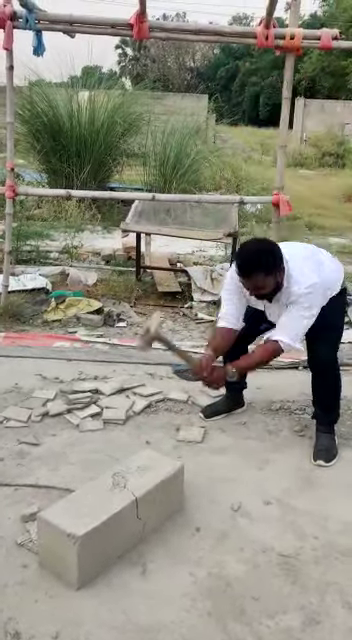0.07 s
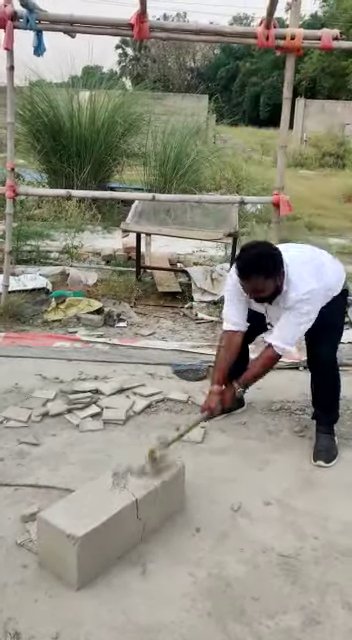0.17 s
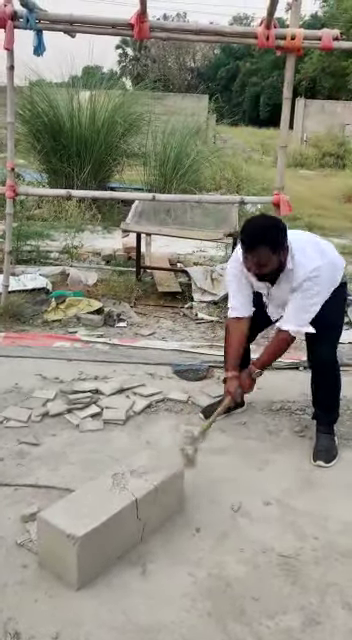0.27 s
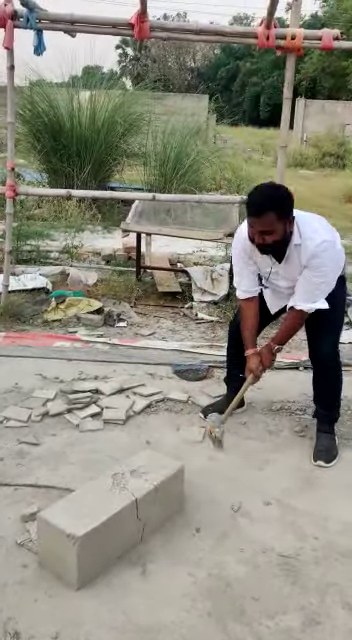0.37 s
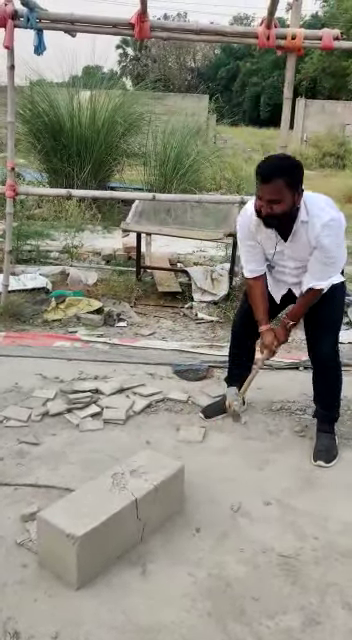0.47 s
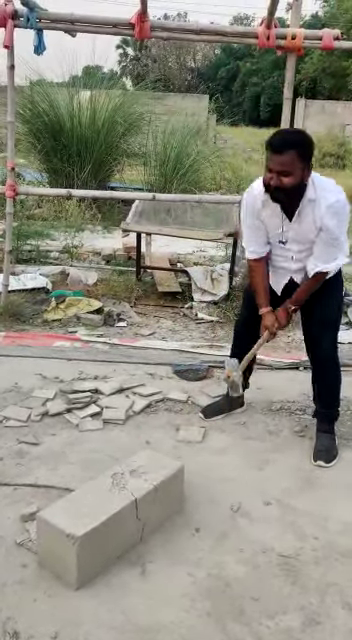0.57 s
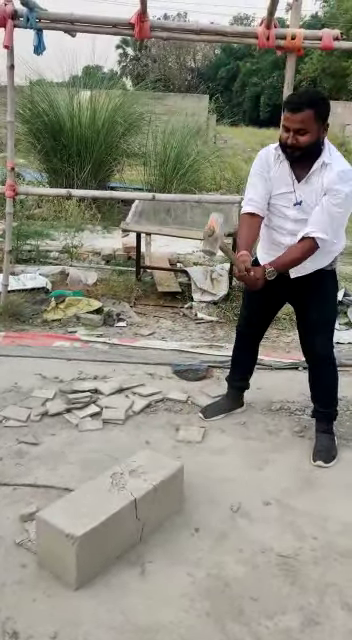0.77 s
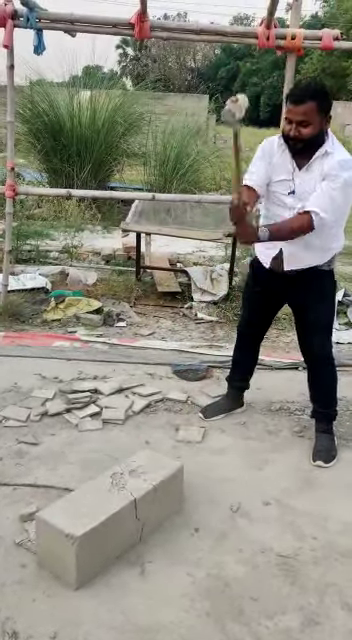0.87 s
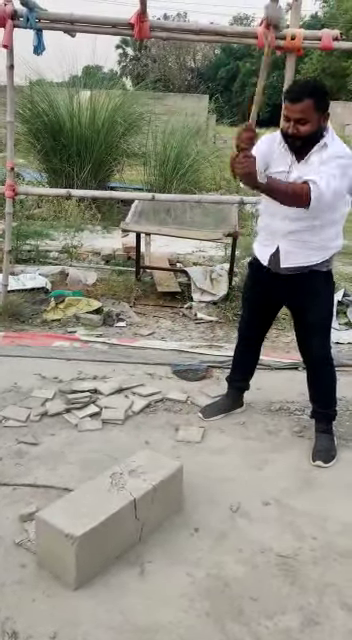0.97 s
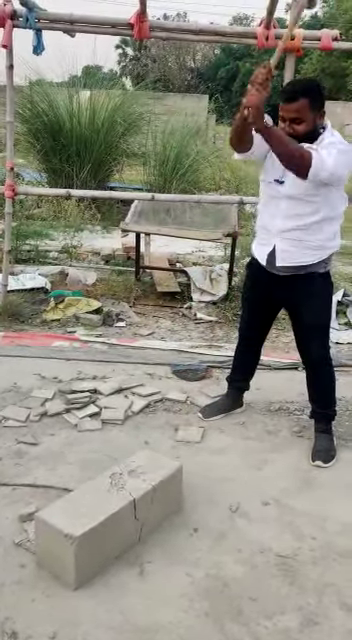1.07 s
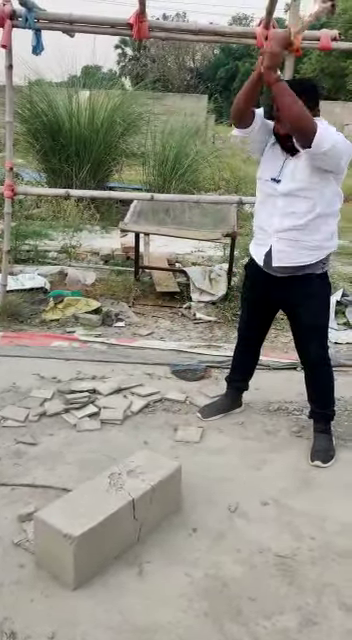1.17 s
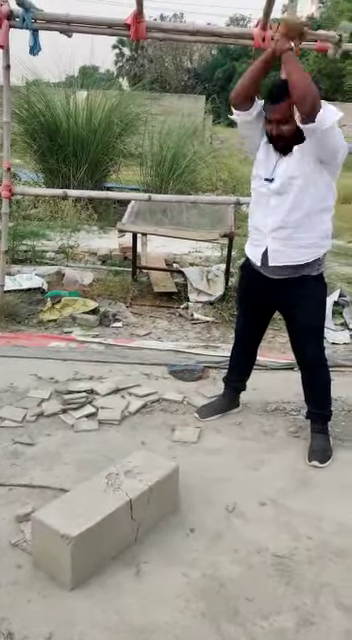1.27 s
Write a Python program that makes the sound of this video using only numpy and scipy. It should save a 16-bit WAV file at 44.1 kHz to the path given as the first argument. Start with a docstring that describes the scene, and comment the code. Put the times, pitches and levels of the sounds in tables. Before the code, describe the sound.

A sledgehammer strikes a concrete block once at about 0.2 seconds, a sharp, gritty crack with a dead thud and a short stony ring. A weaker, duller echo returns near 0.35 seconds, and further echoes roll away by about one second. Tiny stone chips tick faintly around 0.4, 0.7 and 1 second. Faint, distant insects shrill steadily over a low outdoor rumble throughout.

```python
"""Insects shrill steadily over a low outdoor rumble. Then a sledgehammer strikes a concrete block once:
a spray of grit from the crushed surface, a dead thud of pushed-out air and a short stony ring.
The blow scatters off nearby rubble, then returns from the yard's walls and trees as dull echoes
in a rolling tail. Small chips tick, the last as the hammer is lifted."""
import sys
import numpy as np
from scipy import signal
from scipy.fft import rfft, irfft
from scipy.io import wavfile

SR = 44100
rng = np.random.default_rng(int(sys.argv[2]) if len(sys.argv) > 2 else 0)


def digitize_waveform(pressure):
    """Quantize a signal to 16-bit integers and store it at the path in sys.argv[1].

    Rows of a 2-D input are taken as channels; values are limited to [-1, 1].
    """
    field = np.atleast_2d(pressure).T
    bounded = np.clip(field, -1, 1)
    quanta = np.round(bounded * 32767).astype(np.int16)
    wavfile.write(sys.argv[1], SR, quanta)


N = 57330
TIME_S = np.arange(N) / SR
BLOW_S = .2135  # full contact

# Noise spectra. Each row: frequency in Hz, relative spectral density in dB.
AIR_SPECTRUM = [(20, -2), (34, -3), (50, 3), (80, -7), (112, -3), (160, -15), (280, -10), (400, -18),
                (500, -19.5), (900, -20.5), (1700, -23.5), (2400, -28), (3200, -34.5), (6000, -41),
                (9000, -48.5), (15000, -44)]
INSECT_SPECTRUM = [(3500, -30), (4200, -15), (4500, -2), (4780, -3), (4833, 5), (4890, -3), (5200, -9),
                   (5650, -9), (6400, -21), (8500, -40)]
GRIT_SPECTRUM = [(100, -5), (300, -1), (800, -3), (2100, -2), (2700, -4), (3300, -16), (4700, -7),
                 (7000, -23), (10000, -42), (16000, -35)]
RUBBLE_SPECTRUM = [(50, -8), (130, 2), (300, 1), (620, -1), (800, 1), (1080, -8), (1400, -5), (2200, -9),
                   (3200, -26), (4600, -23), (7500, -39), (12000, -52)]
WALL_SPECTRUM = [(50, -4), (115, 4), (160, -2), (210, 4), (480, 0), (620, -4), (790, 3.5), (960, 0),
                 (1070, -7), (1250, 0), (1900, -6), (2500, -13), (3100, -23), (4600, -21), (7500, -38),
                 (12000, -50)]
TREE_SPECTRUM = [(80, -12), (250, -5), (480, 0), (800, 1), (1100, -4), (1900, -8), (3100, -20), (7000, -50)]
CHIP_SPECTRUM = [(1000, -20), (2300, -10), (3100, -1), (4200, -1), (5200, -5), (7500, -10), (10000, -30),
                 (16000, -38)]
# Stereo likeness of the noise. Each row: frequency in Hz, left-right correlation.
COHERENCE = [(25, .6), (70, .96), (200, .96), (450, .66), (900, .5), (1600, .42), (3000, .05), (15000, 0)]
# Modes of block and hammer head. Each row: frequency in Hz, level in dB, T60 in seconds.
BLOCK_MODES = [(250, -24, .03), (520, -14.5, .008), (910, -4.5, .008), (1290, -8, .012), (1690, -5, .009),
               (2150, -12, .009), (2630, -26, .07), (4400, -18.5, .04), (4950, -17, .05)]
# Scatter from rubble, walls and bushes, and the tree line.
# Each holds: arrival in seconds, rise in seconds, level in dB, T60 in seconds.
RUBBLE_SCATTER = (.217, .004, -27.3, .40)
WALL_SCATTER = (.289, .07, -28.2, .72)
TREE_SCATTER = (.5, .13, -45.6, 1.5)
# Distinct echoes. Each row: delay in seconds, level in dB, low-pass in Hz, left lead in seconds,
# smear in dB relative to the echo.
WALL_ECHOES = [(.055, -21, 2200, 0, -3), (.1363, -5.3, 1520, .00004, -15), (.167, -20, 2600, 0, 0),
               (.19, -18, 1900, 0, -2), (.268, -23, 1400, 0, 3), (.3057, -17, 1450, .00006, -5),
               (.3097, -20.5, 1450, .00002, -5), (.3176, -22, 1400, .00002, -3), (.447, -27, 1150, 0, 5)]
# Stone chips. Each row: start in seconds, level in dB.
CHIP_TICKS = [(.38, -39), (.696, -38), (.6992, -43), (.971, -52)]


def from_db(db):
    """Decibels to gain."""
    return 10 ** (np.asarray(db) / 20)


def unit_rms(x):
    """Scale to rms 1."""
    return x / np.sqrt(np.mean(x ** 2) + 1e-20)


def at_hz(table, hz):
    """Read a table on a log-frequency axis."""
    knots_hz, values = np.transpose(table)
    return np.interp(np.log(np.maximum(hz, 1)), np.log(knots_hz), values)


def filtered(x, hz, kind, order=2):
    """Causal Butterworth filter."""
    return signal.sosfilt(signal.butter(order, hz, kind, fs=SR, output="sos"), x + 1e-18)


def delayed(x, delay_s):
    """Fractional delay."""
    return np.interp(TIME_S - delay_s, TIME_S, x, left=0, right=0)


def decay(start_s, t60_s):
    """Sudden start, exponential fall."""
    return (TIME_S >= start_s) * from_db(-60 * np.maximum(TIME_S - start_s, 0) / t60_s)


def coloured(pair, spectrum):
    """Shape two unrelated signals to a spectrum, alike in the bass; rms 1."""
    hz = np.fft.rfftfreq(N, 1 / SR)
    mid, side = rfft(pair)
    coherence = at_hz(COHERENCE, hz)
    stereo = np.sqrt(1 + coherence) * mid + np.sqrt(1 - coherence) * side * [[1], [-1]]
    return unit_rms(irfft(from_db(at_hz(spectrum, hz)) * stereo, N))


def noise(spectrum):
    """Coloured stereo noise; rms 1."""
    return coloured(rng.standard_normal((2, N)), spectrum)


def flutter(rate_hz):
    """Low-passed random wobble; rms 1."""
    return unit_rms(filtered(rng.standard_normal(N), rate_hz, "low"))


def outdoor_air(level_db=-42.4):
    """Steady low rumble with faint hiss."""
    return from_db(level_db) * noise(AIR_SPECTRUM)


def insects(level_db=-54, fade_db_per_s=1.5, flutter_db=1.3):
    """A far chorus: a shrill noise band that flutters and fades slightly."""
    trend_db = level_db - fade_db_per_s * (TIME_S - TIME_S.mean())
    return from_db(trend_db + flutter_db * flutter(rate_hz=140)) * noise(INSECT_SPECTRUM)


def surface_crush(grit_db=-23.5, spurt_db=3, lead_s=.0013, rise_s=.001, snap_db=-41, snap_s=.0006):
    """Grit bursts from under the hammer in uneven spurts, with a thin bright snap at contact."""
    start_s = BLOW_S - lead_s
    burst = np.clip((TIME_S - start_s) / rise_s, 0, 1) * decay(start_s, t60_s=.095)
    snap = filtered(rng.standard_normal((2, N)), 11000, "high")
    snap *= np.exp(-((TIME_S - BLOW_S) / snap_s) ** 2)
    grit = from_db(grit_db + spurt_db * flutter(rate_hz=400)) * burst * noise(GRIT_SPECTRUM)
    return grit + from_db(snap_db) * snap


def block_strike(thud_db=-11.3, lag_s=.0009, width_s=.00061, contact_hz=2900, bounce_db=-8):
    """The block pushes out one air pulse; its damped ring is doubled by a close reflection."""
    pulse_time = (TIME_S - BLOW_S - lag_s) / width_s
    thud = from_db(thud_db) * pulse_time * np.exp((1 - pulse_time ** 2) / 2)
    ring = sum(from_db(db) * decay(BLOW_S, t60_s) * -np.cos(2 * np.pi * hz * (TIME_S - BLOW_S))
               for hz, db, t60_s in BLOCK_MODES)
    ring = filtered(ring, contact_hz, "low", order=4)
    return thud + ring + from_db(bounce_db) * delayed(ring, delay_s=.0023)


def scatter(shape, spectrum, rough_db):
    """Countless small reflections swell and die, treble first; single facets stand out."""
    facets_per_s, facet_spread_db, facet_share = 550, 3, .45
    treble_loss_db_per_s = 10
    start_s, rise_s, level_db, t60_s = shape
    swell = np.sqrt(np.clip((TIME_S - start_s) / rise_s, 0, 1))
    age_s = np.maximum(TIME_S - start_s - rise_s, 0)
    sizes = from_db(facet_spread_db * rng.uniform(-1, 1, (2, N))) * rng.choice([-1, 1], (2, N))
    facets = coloured(sizes * (rng.random((2, N)) < facets_per_s / SR), spectrum)
    wash = np.sqrt(1 - facet_share) * noise(spectrum) + np.sqrt(facet_share) * facets
    bass = filtered(wash, 1500, "low", order=1)
    wash = bass + (wash - bass) * from_db(-treble_loss_db_per_s * age_s)
    wash *= from_db(level_db + rough_db * flutter(rate_hz=60))
    return wash * swell * from_db(-60 * age_s / t60_s)


def wall_echoes(blow, low_cut_hz=520, clink_db=-5):
    """Each wall returns a thinner, duller blow with a faint clink, smeared by its rough face."""
    echoes = np.zeros((2, N))
    thin = filtered(blow, low_cut_hz, "high", order=1)
    clink = from_db(clink_db) * filtered(blow, 4200, "high", order=6)
    for delay_s, level_db, dull_hz, left_lead_s, smear_db in WALL_ECHOES:
        dull = filtered(thin, dull_hz, "low", order=4)
        echo = from_db(level_db) * delayed(dull + clink, delay_s)
        face = rng.standard_normal((2, N)) * decay(0, t60_s=.14)
        smear = signal.fftconvolve(echo[None], unit_rms(face) / np.sqrt(N), axes=1)[:, :N]
        echoes += np.array([echo, delayed(echo, left_lead_s)]) + from_db(smear_db) * smear
    return echoes


def chip_ticks(t60_s=.012):
    """Small stone chips make tiny dry clicks."""
    return noise(CHIP_SPECTRUM) * sum(from_db(db) * decay(start_s, t60_s) for start_s, db in CHIP_TICKS)


def scene(left_bias_db=1.5, right_lead_s=.00014):
    """Background a little to the left; one blow, arriving first on the right; the yard's answer."""
    pan = from_db([[left_bias_db / 2], [-left_bias_db / 2]])
    blow = block_strike()
    direct = surface_crush() + np.array([delayed(blow, right_lead_s), blow])
    tail = scatter(RUBBLE_SCATTER, RUBBLE_SPECTRUM, rough_db=1.5)
    tail += scatter(WALL_SCATTER, WALL_SPECTRUM, rough_db=1.1)
    tail += scatter(TREE_SCATTER, TREE_SPECTRUM, rough_db=1.5)
    return direct + tail + wall_echoes(blow) + chip_ticks() + pan * (outdoor_air() + insects())


def record(dry, ceiling=.95, cutoff_hz=17100):
    """Soft clip, then a steep low-pass."""
    rounded = ceiling * np.tanh(dry / ceiling)
    return signal.sosfilt(signal.cheby2(12, 70, cutoff_hz, fs=SR, output="sos"), rounded)


dry = scene()
out = record(dry)
digitize_waveform(out)
```